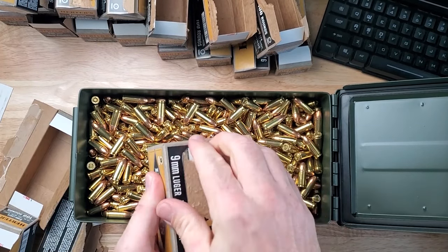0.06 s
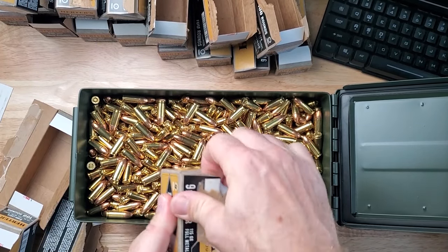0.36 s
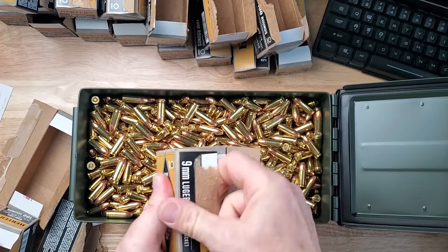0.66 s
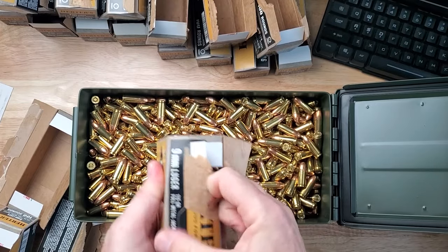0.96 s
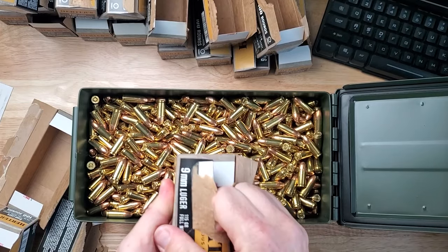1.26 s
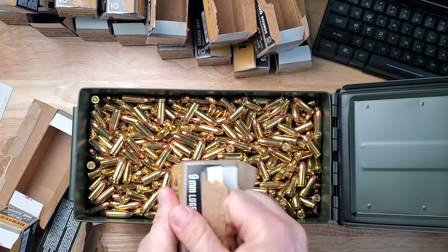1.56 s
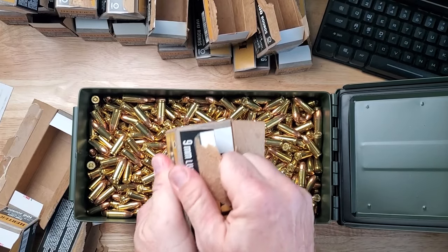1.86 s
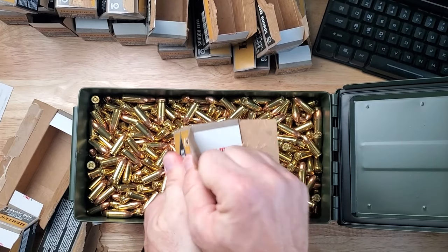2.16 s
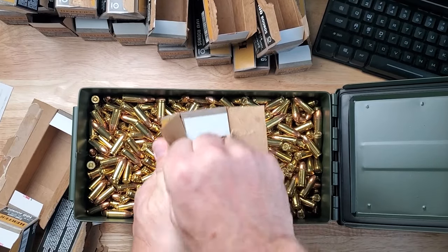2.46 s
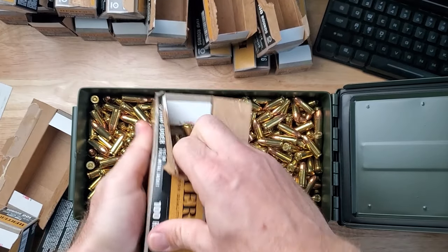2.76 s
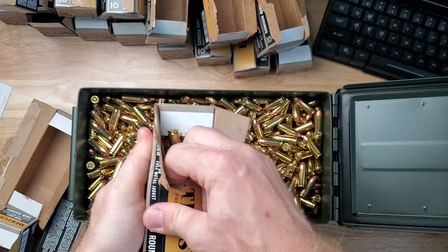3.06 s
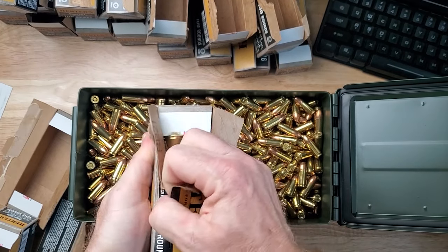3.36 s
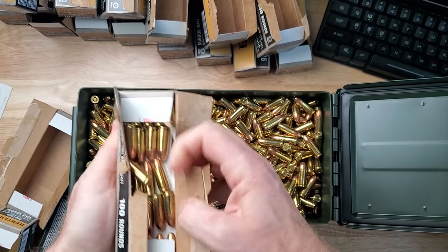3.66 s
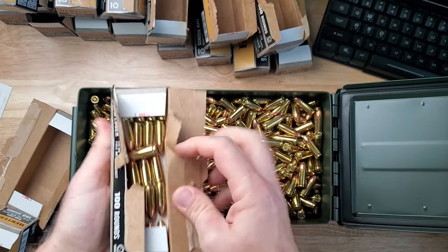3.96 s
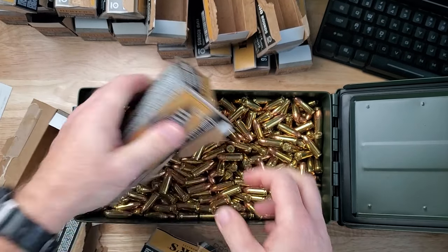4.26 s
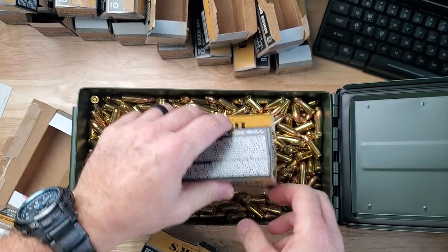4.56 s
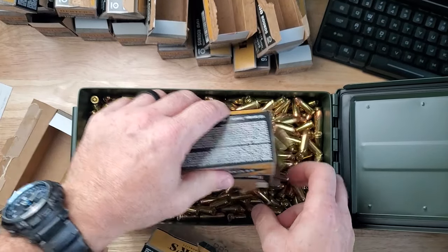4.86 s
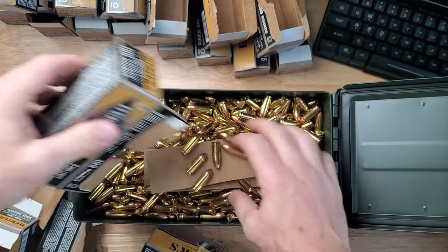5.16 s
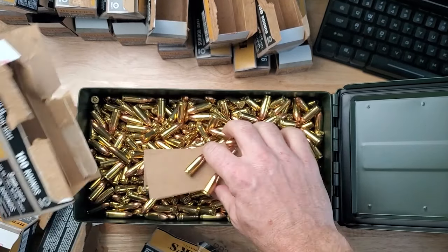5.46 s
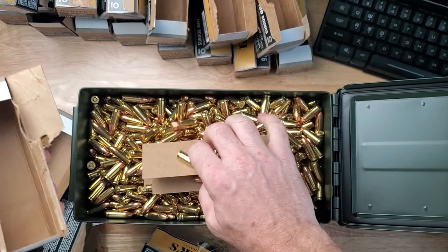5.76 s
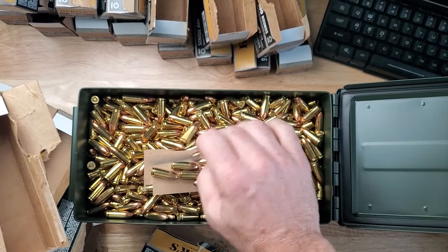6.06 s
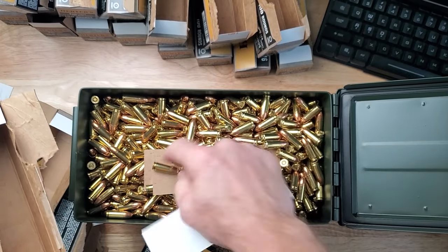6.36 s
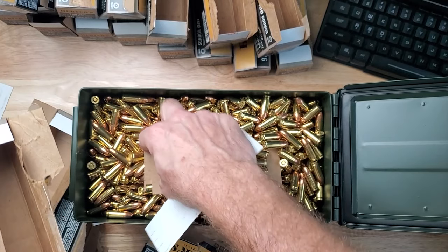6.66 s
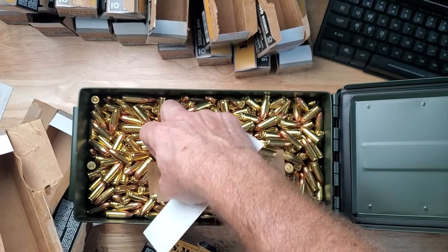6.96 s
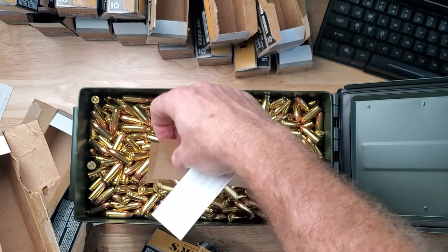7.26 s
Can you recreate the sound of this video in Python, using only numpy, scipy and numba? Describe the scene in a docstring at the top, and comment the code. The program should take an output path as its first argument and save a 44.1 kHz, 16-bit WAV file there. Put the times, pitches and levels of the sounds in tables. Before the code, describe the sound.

A cardboard box is torn open, then loose brass cartridges pour clinking into a nearly full metal can and are raked by hand.

```python
"""Brass cartridges tipped into a can

Over a desk in a small room, hands rip open a cardboard box, tip its loose brass cartridges into a
nearly full steel can, then rake through the heap. The card rubs, tears and snaps. The brass clinks,
hushed at once by the heap, and the can rings faintly under it. A stereo microphone hangs above."""
import sys
import numpy as np
from scipy import signal
from scipy.fft import rfft, irfft
from scipy.io import wavfile
from scipy.ndimage import uniform_filter1d
from numba import njit

SR = 44100
rng = np.random.default_rng(int(sys.argv[2]) if len(sys.argv) > 2 else 0)


def persist_wave(psi):
    """Save psi, clipped to +-1, as 16-bit WAV."""
    counts = np.round(np.clip(psi, -1, 1) * 32767).astype(np.int16)
    wavfile.write(sys.argv[1], SR, np.atleast_2d(counts).T)


N = 322812
TIME = np.arange(N) / SR
RING_TIME = TIME[:2048]  # long enough for one touch to die away
SAMPLES_PER_MS = SR / 1000

# Edges of four bands, called low, middle, high and top: (frequency [Hz])
# Below, level sets the middle band. Weight (low) and hardness or brightness (high) are added to it;
# fizz (top) is added to the high band.
CONTACT_BANDS = [130, 900, 3800, 8000, 17000]
# Cartridges striking each other:
# (time [s], length [ms], note [Hz], level [dB], hardness [dB], fizz [dB])
BRASS_CLINKS = [(3.7096, 2.03, 1720.0, -33, -7, -10), (3.7942, 1.1, 1916, -44, 1.0, 3),
                (3.8158, 5.1, 1770.0, -32.5, -7.5, -5), (3.9891, 2.06, 2170.0, -36.5, -1.5, 1),
                (4.1623, 1.91, 2950, -36.0, 0, 4.5), (4.224, 4.9, 3045, -38.5, -5.5, -5),
                (4.2826, 4.8, 1956, -23.5, -11, -2.5), (4.3302, 4.1, 1800, -19.5, -22, -7.5),
                (4.3539, 7.3, 1700.0, -18, -23, -1.0), (4.3925, 4.2, 1220, -21.5, -4, 7),
                (4.5685, 3.2, 1660.0, -16, -11.0, -4), (4.581, 14.5, 2960.0, -22, -7, 1.5),
                (4.5975, 8.4, 2740, -12.5, -5.5, -8), (4.6379, 5.6, 2810.0, -13.0, -4.0, -25),
                (4.7419, 8.3, 2968, -13.5, -6.5, -2), (4.7548, 16.9, 2950, -11, -8, -16),
                (4.8916, 3.2, 1990, -22, 2.5, -5.0), (4.9325, 2.14, 1380, -23.5, 0.5, 5),
                (5.0042, 5.7, 1540, -24, 1, -1.5), (5.029, 3.1, 1520.0, -24.5, 2, -4),
                (5.0573, 3.2, 1510.0, -29.5, 4.0, 1), (5.0683, 2.66, 3000, -20.5, 1, -2.5),
                (5.11, 1.9, 2650.0, -25, -0.5, -1), (5.129, 1.9, 2720.0, -38, 12, -4),
                (5.1735, 7.8, 2200, -24.5, 2, 3), (5.2419, 3.95, 2110.0, -20.5, 1.5, -3.5),
                (5.3246, 1.8, 1840.0, -41.0, -5.5, 15.0), (5.3456, 6.4, 1470, -34, -0.5, 1.5),
                (5.368, 2.3, 1410.0, -27.5, -4.5, -4.5), (5.419, 2.15, 3120.0, -37, 7, 2.0),
                (5.4383, 1.72, 2170.0, -43, 6.5, 2), (5.451, 2.0, 2970.0, -35.5, 2, 3),
                (5.5145, 3.0, 3080, -35.5, -3.5, -11.5), (5.6037, 1.75, 3030.0, -45, 12.5, 0),
                (5.747, 3.9, 1427, -27.5, -4, -3), (5.7911, 4.5, 1698, -31, -2, -2),
                (5.8668, 4.2, 1410.0, -30, -3, -8), (5.8841, 3.97, 1410.0, -25.0, -1.5, -10),
                (5.9867, 2.0, 2896, -35.5, -1.5, 2), (6.0304, 2.74, 1722, -32.5, 4, 3.5),
                (6.0457, 4.35, 2760, -21, -1, -3), (6.129, 12, 1260, -39.5, 4.5, 2),
                (6.2639, 2.0, 2930.0, -50, 9, -1), (6.3246, 13.5, 1886, -39.0, -8, -7.5),
                (6.416, 4.9, 1705, -33, 1.5, -11), (6.5714, 8.7, 1798, -43, 10.5, 1),
                (6.7036, 4.6, 3140, -46.5, 7.5, -7), (6.7281, 6.5, 1430, -41, 3.5, 2),
                (6.7814, 3.1, 1790.0, -39.5, -2, -12), (6.8922, 7.9, 3020, -28, 2, -10.5),
                (6.9472, 6.7, 1765, -33.5, -10.5, -10.5), (7.0153, 11.3, 1884, -26.5, -4, -4.5),
                (7.0689, 1.96, 3083, -38, 4, -8.5), (7.1259, 1.9, 1200.0, -37, -5, 9),
                (7.1861, 8.9, 2869, -23, -1.0, -5.5), (7.21, 4.6, 2840.0, -28, 1.0, -15),
                (7.2952, 5.0, 2260.0, -24.5, 4.5, -5), (7.3084, 7.6, 2980.0, -18, -1, 0.5)]
# Surges of cartridges sliding out of the box:
# (peak time [s], swell [s], fade [s], level [dB], weight [dB], brightness [dB], scrape pitch [Hz])
POUR_STROKES = [(4.317, 0.071, 0.096, -29.0, -5, -9.5, 1820),
                (4.354, 0.021, 0.139, -23.0, -2.5, -2, 1680.0),
                (4.438, 0.067, 0.16, -23.0, -13.0, -2.5, 1200.0),
                (4.595, 0.096, 0.068, -18.5, -4.5, -7.5, 2940.0),
                (4.637, 0.076, 0.069, -19.0, -27, -5.5, 2860),
                (4.756, 0.092, 0.16, -22.0, -6.5, -2.5, 2880)]
# The heap settling and being raked:
# (peak time [s], swell [s], fade [s], level [dB], weight [dB], brightness [dB], scrape pitch [Hz])
RAKE_STROKES = [(4.844, 0.09, 0.33, -25.0, -19.5, -5.5, 2750), (5.066, 0.28, 0.38, -27.5, -16, -5.5, 1430),
                (5.378, 0.062, 0.18, -41.5, -4.5, -4, 1420), (5.566, 0.036, 0.12, -43.0, -16, -8.5, 3020),
                (5.774, 0.128, 0.15, -38.5, -7.5, -3.0, 1722), (5.928, 0.07, 0.022, -36.5, -14, -7.5, 1749),
                (6.059, 0.098, 0.17, -40.0, -12, -7.0, 2897), (6.146, 0.063, 0.04, -41.0, -8, -3, 1680.0),
                (6.299, 0.082, 0.17, -50.5, -7, -6, 1880.0), (6.566, 0.057, 0.12, -38, -11.5, -3, 1775),
                (6.715, 0.0154, 0.384, -47.0, -7, -0.5, 1437),
                (6.89, 0.042, 0.23, -39.5, -21.0, -8.0, 3050),
                (7.073, 0.1, 0.2, -33.0, -12.5, -5.5, 1200.0),
                (7.19, 0.031, 0.13, -28.0, -15.5, -6.5, 2920),
                (7.314, 0.063, 0.094, -26.0, -17, -5.5, 3000.0)]
# Flaps popping and fibres ripping:
# (time [s], length [ms], note [Hz], level [dB], weight [dB], hardness [dB], fizz [dB])
CARD_SNAPS = [(0.0498, 10.7, 1360.0, -50.5, -3.5, -6.0, -18.0), (0.2827, 3.93, 1200.0, -28.5, 0.5, -41, 9),
              (0.3544, 6.3, 2060.0, -38, -11.0, 0, -13), (0.4205, 4.54, 2250, -22.5, 0, -4.5, -10),
              (0.5029, 14.9, 3570, -28, -2, 0.5, -4.5), (0.6025, 7.9, 1190, -23, -13, -0.5, -5),
              (0.6384, 4.7, 2308, -39, -27, -1.0, -6.5), (0.7125, 5.6, 2000.0, -19.5, -14.5, -2.5, 1.0),
              (0.7407, 7.5, 3070, -25.5, -7.5, -1.5, -1.5), (0.7671, 12.3, 2800, -29, -12, -2.5, -3),
              (0.7971, 5.0, 3170, -33, -28, 0, -8), (0.9956, 2.9, 2930.0, -32.5, -24.0, -8, -8.5),
              (1.0683, 3.6, 1720.0, -34, -15, -1.5, -1.5), (1.3926, 3.8, 2000.0, -40.5, -10, -5.5, -7),
              (1.5698, 4.1, 1100, -32.5, -3, -1, -15.0), (1.6544, 5.6, 1200, -28.5, 3, -15.0, -6),
              (1.6845, 4.06, 1942, -27, -4, -19, -13.5), (1.7551, 11.6, 3390, -34.0, -33, -7.5, -9),
              (1.8287, 4.6, 3100.0, -31.5, -15, -5.5, -12), (2.0226, 5.66, 1551, -32.5, -4, -11.5, -12.0),
              (2.2024, 8.6, 2930.0, -14, -11, -8, -2.0), (2.2409, 14.4, 1144, -25, -2.5, -10, -11),
              (2.3706, 3.9, 2705, -27.5, -14.5, -16, -13), (2.4092, 5.34, 1670.0, -27, -14.5, -14, -3),
              (2.4507, 10.3, 2720, -30.5, -13, -4, -6), (2.4878, 5.35, 1606, -33.0, 4, -29, -6.5),
              (2.6466, 28.8, 1140.0, -23.5, -2.5, -8.5, -6), (2.7281, 1.0, 3260, -33.5, -22.5, 0.5, 10.5),
              (2.75, 13.9, 2952, -26.0, -13, -7.5, 1.5), (2.8227, 2.77, 1848, -33.5, -5, 0, -5),
              (2.8452, 17.3, 1831, -23, -21, -2.5, -1.5), (2.9687, 2.82, 1131, -33.5, -4, -26, -2.0),
              (2.9983, 1.9, 2014, -33.5, -13.5, -11, -11.5), (3.0919, 2.92, 2153, -51, -14.5, 12.5, -4.5),
              (3.2581, 10.5, 3324, -18.5, -17.5, -2.5, 0), (3.3881, 2.98, 2033, -30.5, -21.5, -16.0, -5.5),
              (3.4622, 4.8, 2068, -20, -29, -1.5, 0.5), (3.4721, 5.2, 1871, -14.5, -3.5, -11, 3.5),
              (3.4861, 13.1, 1742, -19, -6.5, -12, 2), (3.5402, 4.66, 3080.0, -26.5, -9, -1.5, 7),
              (3.5692, 3.9, 2150.0, -19.5, -21.5, -7.5, -2)]
# Cardboard rubbing and tearing, then cartridges shifting inside the box:
# (peak time [s], swell [s], fade [s], level [dB], weight [dB], brightness [dB], scrape pitch [Hz])
BOX_STROKES = [(0.003, 0.044, 0.052, -48.5, -12, -13, 1810.0), (0.077, 0.042, 0.066, -48.5, -21, -13, 1860),
               (0.314, 0.1, 0.083, -43.0, -3.5, -7.5, 1160.0), (0.443, 0.14, 0.081, -44.0, -9, -2.5, 2200),
               (0.5, 0.021, 0.26, -36.0, -16, -3.5, 3400.0),
               (0.674, 0.17, 0.084, -48.5, -17.0, 6.5, 1800.0),
               (0.739, 0.062, 0.099, -33.5, -21, 0.5, 3160), (0.924, 0.058, 0.2, -37.5, -9, -6, 3000),
               (1.033, 0.03, 0.036, -35.5, -11, -7.5, 1736), (1.123, 0.12, 0.092, -50, -17, 5.5, 3050),
               (1.254, 0.056, 0.08, -44.0, -12, -0.5, 3150), (1.344, 0.046, 0.36, -55.0, -5.5, -3, 3165),
               (1.569, 0.02, 0.391, -45.5, -8, -6.5, 1108), (1.754, 0.035, 0.178, -40.5, -11, -8.5, 3402),
               (2.01, 0.22, 0.032, -52.5, -7, 4.5, 3400.0), (2.167, 0.13, 0.073, -40.5, -19, 5, 2998),
               (2.2, 0.028, 0.057, -26.0, -20.5, -0.5, 2932), (2.359, 0.098, 0.11, -41, -20.0, -7.5, 2700),
               (2.465, 0.14, 0.094, -36.5, -13.0, -7.5, 1601),
               (2.651, 0.076, 0.14, -25.5, -12, -8.5, 1140.0), (2.814, 0.12, 0.053, -32.5, -4.5, -11, 1750),
               (2.858, 0.075, 0.188, -29.0, -13, -5, 1860), (3.227, 0.21, 0.092, -47.5, -13.5, 4, 1740.0),
               (3.257, 0.065, 0.073, -36.0, -19.5, 2.5, 3308),
               (3.374, 0.014, 0.2, -27.0, -14.5, -8.5, 2005), (3.509, 0.0701, 0.09, -27.0, -9, -2.5, 1802),
               (3.566, 0.13, 0.067, -22.0, -13.5, -7.5, 2163), (3.725, 0.023, 0.02, -39, -55, -10.5, 1734),
               (3.812, 0.078, 0.052, -37, -18, -6, 1752), (3.943, 0.14, 0.22, -39.0, -15.5, -7, 1742),
               (4.132, 0.068, 0.075, -36.0, -11.0, -7, 2016), (4.228, 0.031, 0.031, -36, -7.0, -12, 3080.0)]

# A mode is a note an object rings at; its ring time, t60, is how long it takes to fall by 60 dB.
# A cartridge lying among others: (pitch [Hz], ring time [s], level [dB])
CARTRIDGE_MODES = [(675, 0.025, -13.5), (1352, 0.06, -12.5), (1700, 0.024, -11), (2000, 0.04, -2.5),
                   (2930, 0.0063, 4), (6140, 0.0054, 0), (15300, 0.0061, -7)]
# The panels of the box: (pitch [Hz], ring time [s], level [dB])
PANEL_MODES = [(251, 0.024, 0.5), (445, 0.014, 0), (516.9, 0.037, 2), (1200, 0.05, -2.5),
               (1680, 0.034, -5.5), (2100, 0.019, -11), (3100, 0.034, 8)]
# The walls of the steel can: (pitch [Hz], ring time [s], level [dB])
STEEL_MODES = [(175.4, 0.16, -1), (225.7, 0.38, 3), (278, 0.57, 11), (403, 0.21, 4), (662, .24, -14),
               (670.5, 0.077, -11), (817, 0.23, -2), (980, 0.49, -3), (1160, .25, -20), (1225, 0.28, 3),
               (1410, .25, -7), (1670, 0.25, -20), (1690, 0.23, 7), (1940, 0.31, -15), (2720, .23, -1),
               (2880, 0.11, 0), (2700, .47, -13), (2910, .18, 5)]

# The tone of brass on brass: (frequency [Hz], gain [dB])
BRASS_TONE = [(130, -25.5), (215, -17), (370, -10.5), (640, -15.5), (900, -10.5), (1250, -0.5),
              (2300, -3.5), (3000, -2), (3990, -7), (6470, 1.5), (8000, -10), (9290, -13), (12000, -9),
              (15100, -12), (16000, -12)]
# The hollow tone added during the pour: (frequency [Hz], gain [dB])
HOLLOW_TONE = [(130, -5), (300, -2), (450, -0.5), (660, 11.5), (830, 4), (1150, -2), (2300, -3.5),
               (2950, -3.5), (3600, -6), (16000, -6)]
# The tone of cardboard: (frequency [Hz], gain [dB])
CARD_TONE = [(130, -20), (260, -21.5), (430, -4.5), (560, -6), (800, -10), (1180, 0.5), (1710, 5),
             (2410, 2.5), (3200, -3), (4070, -6), (6340, 1), (8000, -10.5), (9480, -14), (12600, -8),
             (16000, -8.5)]
# The tone of the room's air: (frequency [Hz], gain [dB])
AIR_TONE = [(20, -10), (50, -20), (90, -6.5), (150, -16.5), (290, -2), (450, -7.5), (900, -15), (1500, -20),
            (4000, -33), (16000, -47)]
# Edges of the bass, middle and treble of the room's echo: (frequency [Hz])
ECHO_BANDS = [130, 900, 3800, 17000]
# How the microphone's two sides hear each pitch: (frequency [Hz], left minus right [dB])
MIC_BALANCE = [(100, -0.5), (350, 2.5), (700, -1.5), (1300, 2.5), (2400, 3), (3600, -3), (5300, 7),
               (7000, -1), (9000, 2), (11500, -7.5), (14500, 8.5)]


def cartridges(box_empty_s=4.86):
    """A dense, hollow roar as the load slides out; thin, bright rattling once it lies on the heap."""
    tone = tone_filter(BRASS_TONE)
    hollow = convolve(tone, tone_filter(HOLLOW_TONE))
    poured = sum(row[0] < box_empty_s for row in BRASS_CLINKS)
    sliding = brass_on_brass(BRASS_CLINKS[:poured], POUR_STROKES, hollow, peak_per_s=6500)
    settling = brass_on_brass(BRASS_CLINKS[poured:], RAKE_STROKES, tone, peak_per_s=5500)
    return sliding + settling


def brass_on_brass(hits, strokes, tone, peak_per_s, weight_db=-15.5):
    """Single clinks stand out of a rattle of small touches."""
    hits = [(*row, weight_db, hardness, fizz) for *row, hardness, fizz in hits]
    clinks = blows(hits, CARTRIDGE_MODES, tone, detune=0.06, click_db=13, note_db=-9.5, purity=0.39,
                   trim_db=(-0.31, 0.36, 0.59, 0.1), slips_per_ms=1.8, spread_db=1.5)
    rattle = grains(strokes, CARTRIDGE_MODES, tone, detune=0.088, click_db=14.5, peak_per_s=peak_per_s,
                    rate_slope=0.4, spread_db=5.5, scrape_db=-9, purity=0.307,
                    trim_db=(0.28, 0.14, 1.0, 0.05), smooth_s=0.05)
    return clinks + rattle


def cardboard():
    """Card rubs and tears, flaps pop and ring the panels, then the load shifts inside the box."""
    tone = tone_filter(CARD_TONE)
    pops = blows(CARD_SNAPS, PANEL_MODES, tone, detune=0.076, click_db=12.5, note_db=-16, purity=0.55,
                 trim_db=(0.078, 0.079, 0.091, 0.1), slips_per_ms=2.5, spread_db=3)
    rubbing = grains(BOX_STROKES, PANEL_MODES, tone, detune=0.094, click_db=15, peak_per_s=5500,
                     rate_slope=0.25, spread_db=5.0, scrape_db=-3.5, purity=0.54,
                     trim_db=(-0.2, -0.79, 0.32, -0.43), smooth_s=0.07)
    return pops + rubbing


def blows(hits, modes, tone, detune, click_db, note_db, purity, trim_db, slips_per_ms, spread_db):
    """Each blow is a quick burst of tiny slips at one spot."""
    size = len(RING_TIME)
    out = np.zeros((2, N + size))
    for time_s, length_ms, hz, level, weight, hardness, fizz in hits:
        length = max(int(length_ms * SAMPLES_PER_MS), 2)
        count = 1 + int(length_ms * slips_per_ms)
        places = (length * rng.random(count)).astype(int)
        places[0] = 0
        slips = np.zeros(size)
        slips[places] = rng.choice([-1, 1], count) * gain(spread_db * rng.standard_normal(count))
        slips[:length] *= gain(-4 * np.arange(length) / length)  # later slips are gentler
        response = touch(modes, detune, click_db)
        # the piece's own note gains `purity` dB for each dB that the blow is softer
        note = convolve(response, ring(hz, t60=0.008))
        response = response + gain(note_db - purity * hardness) * note
        sound = convolve(convolve(response, slips), tone)
        band_db = level + weight, level, level + hardness, level + hardness + fizz
        start, attack = int(time_s * SR), length + int(3 * SAMPLES_PER_MS)
        for band, db, trim in zip(split_bands(sound, CONTACT_BANDS), band_db, trim_db):
            attack_power = np.mean(band[:, :attack] ** 2)
            out[:, start:start + size] += band * gain(db + trim) / np.sqrt(attack_power)
    return out[:, :N]


def grains(strokes, modes, tone, detune, click_db, peak_per_s, rate_slope, spread_db, scrape_db,
           purity, trim_db, smooth_s, spots=16):
    """Countless small touches at many spots; harder motion makes them louder and more frequent."""
    start, end, (*band_db, scrape_hz) = stroke_curves(strokes)
    _, mid_db, high_db, _ = band_db
    chance = peak_per_s * gain(rate_slope * (mid_db - mid_db.max())) / SR / spots
    sound = 0
    for _ in range(spots):
        places = np.flatnonzero(rng.random(end - start) < chance)
        signs = rng.choice([-1, 1], len(places))
        strengths_db = spread_db * np.minimum(rng.exponential(size=len(places)), 4)
        pulses = np.zeros(end - start)
        pulses[places] = signs * gain(strengths_db)
        sound = sound + convolve(pulses, convolve(touch(modes, detune, click_db), tone))
    # the rubbed piece rings at a pitch that moves with the grip, most clearly in dull rubbing
    scrape = np.array([moving_band(side, scrape_hz, width_hz=320.0) for side in sound])
    sound = sound + gain(scrape_db - purity * (high_db - mid_db)) * scrape
    out = np.zeros((2, N))
    for band, db, trim in zip(split_bands(sound, CONTACT_BANDS), band_db, trim_db):
        # even out the band, then make it follow the strokes
        power = uniform_filter1d(np.mean(band ** 2, axis=0), int(smooth_s * SR))
        out[:, start:end] += band * gain(db + trim) / np.sqrt(np.abs(power) + 1e-12)
    return out


def stroke_curves(strokes, depth_db=20, shape=1.4):
    """Movements swell and fade: gives their span in samples, four band levels and the scrape pitch."""
    peak, swell, release, level, weight, brightness, hz = np.transpose(strokes)[:, :, None]
    start = max(int(np.min(peak - 2 * swell) * SR), 0)
    end = min(int(np.max(peak + 2 * release) * SR), N)
    t = TIME[start:end:64]
    from_peak = np.maximum((peak - t) / swell, (t - peak) / release)
    power = gain(level - depth_db * np.abs(from_peak) ** shape) ** 2 + 1e-14
    top = 0.5 + 1.4 * brightness  # the top band grows faster than the high band
    band_db = [10 * np.log10(np.sum(power * gain(db) ** 2, axis=0))
               for db in (weight, 0, brightness, top)]
    pitch = np.sum(power * hz, axis=0) / np.sum(power, axis=0)
    return start, end, [np.interp(TIME[start:end], t, curve) for curve in (*band_db, pitch)]


def touch(modes, detune, click_db):
    """One touch at a random spot: a click, the object's notes, and echoes off walls and hands."""
    sound = gain(click_db) * (RING_TIME == 0)
    for (hz, t60, db), (shift, share) in zip(modes, rng.standard_normal((len(modes), 2))):
        # where the blow lands decides how strongly each mode answers
        sound = sound + gain(db) * np.tanh(2 * share) * ring(hz * np.exp(detune * shift), t60)
    paths = gain(-1) * unit_energy(surrounding_noise(len(RING_TIME)) * fade(RING_TIME, t60=0.016))
    # the direct sound usually reaches the left side first
    lead_ms = 0.11 + 0.05 * rng.standard_normal()
    lead = int(round(lead_ms * SAMPLES_PER_MS))
    paths[0, max(-lead, 0)] += 1
    paths[1, max(lead, 0)] += 1
    return convolve(paths, sound)


def steel_can(brass, ring_db=-3, apart_hz=1500):
    """The heap shakes the steel walls, whose notes ring on."""
    t = TIME[:SR // 2]
    response = 0
    for hz, t60, db in STEEL_MODES:
        decay = fade(t, t60)
        phase = rng.standard_normal((2, 1)) * hz / apart_hz  # high notes reach the sides out of step
        response = response + gain(db) * 2 * decay / decay.sum() * np.sin(2 * np.pi * hz * t + phase)
    return gain(ring_db) * convolve(brass, response)


def desk_thud(time_s=6.553, hz=85, level_db=-43):
    """The hand presses down on the heap and the desk gives a soft, low thud."""
    t = np.maximum(TIME - time_s, 0)
    return gain(level_db) * np.sin(2 * np.pi * hz * t) * fade(t, t60=0.059)


def room_echo(sound, band_db=(-9, -11, -13), band_t60=(0.36, 0.3, 0.24), rise_s=0.0039):
    """A small furnished room gives a short wash of echoes, longest in the bass."""
    t = TIME[:SR // 2]
    bands = split_bands(surrounding_noise(len(t)), ECHO_BANDS)
    onset = np.minimum(t / rise_s, 1) ** 2
    tail = sum(gain(db) * band * unit_energy(onset * fade(t, t60))
               for band, db, t60 in zip(bands, band_db, band_t60))
    return convolve(sound, tail)


def air_and_hum(air_db=-61, side_db=-9, hum_hz=59.3, hum_db=-70.5):
    """Soft room air and a low hum from the mains power."""
    shared, side = convolve(rng.standard_normal((2, N)), unit_energy(tone_filter(AIR_TONE)))
    air = shared + gain(side_db) * side * np.array([[1], [-1]])
    hum = np.sqrt(2) * np.sin(2 * np.pi * hum_hz * TIME)
    return gain(air_db) * air + gain(hum_db) * hum


def surrounding_noise(size, apart_hz=750):
    """Noise from all around: left and right agree only on the low notes."""
    shared, side = rng.standard_normal((2, size))
    side = signal.sosfilt(signal.butter(1, apart_hz, "high", fs=SR, output="sos"), side)
    return np.array([shared + side, shared - side])


def ring(hz, t60):
    """One struck note dying away."""
    return unit_energy(np.cos(2 * np.pi * min(hz, SR / 2) * RING_TIME) * fade(RING_TIME, t60))


def fade(t, t60):
    """Fall by 60 dB every t60 seconds."""
    return np.exp(-np.log(1000) * t / t60)


def gain(db):
    """Turn decibels into a multiplier."""
    return 10 ** (np.asarray(db) / 20)


def unit_energy(x):
    """Scale to an average energy of one per channel."""
    return x / np.sqrt(np.mean(np.sum(x ** 2, axis=-1)))


def convolve(x, response):
    """Pass a sound through a response, keeping its length."""
    return signal.fftconvolve(np.atleast_2d(x), np.atleast_2d(response), axes=1)[:, :x.shape[-1]]


def tone_filter(points, size=2048):
    """A short response with the tone given by (Hz, dB) points."""
    hz, db = np.transpose(points)
    freqs = np.maximum(np.fft.rfftfreq(size, 1 / SR), 1)
    spectrum = gain(np.interp(np.log(freqs), np.log(hz), db))
    # folding the cepstrum (the log spectrum, transformed) packs the energy at the start
    cepstrum = irfft(np.log(spectrum))
    cepstrum[1:size // 2] *= 2
    cepstrum[size // 2 + 1:] = 0
    return irfft(np.exp(rfft(cepstrum)))


def split_bands(x, edges):
    """Cut a sound into neighbouring frequency bands."""
    return [signal.sosfilt(signal.butter(3, band, "band", fs=SR, output="sos"), x)
            for band in zip(edges, edges[1:])]


@njit
def moving_band(x, hz, width_hz):
    """Let through only a narrow band around a moving pitch."""
    out = np.empty(len(x))
    band_state, low_state = 0.0, 0.0
    for i in range(len(x)):
        tuning, damping = np.tan(np.pi * hz[i] / SR), width_hz / hz[i]
        band = (band_state + tuning * (x[i] - low_state)) / (1 + tuning * (tuning + damping))
        band_state = 2 * band - band_state
        low_state += 2 * tuning * band
        out[i] = damping * band
    return out


def scene():
    """Box, brass, can and desk sound in the room, over its quiet background."""
    brass = cartridges()
    direct = cardboard() + brass + steel_can(brass) + desk_thud()
    return direct + room_echo(direct) + air_and_hum()


def record(dry):
    """Each side of the microphone has its own tone; loud peaks are rounded and the highest treble cut."""
    sides = np.array([tone_filter([(hz, sign * db / 2) for hz, db in MIC_BALANCE]) for sign in (1, -1)])
    rounded = np.tanh(convolve(dry, sides))
    treble_cut = signal.ellip(10, 0.2, 70, 15900, fs=SR, output="sos")
    return signal.sosfilt(treble_cut, rounded)


dry = scene()
out = record(dry)
persist_wave(out)
```